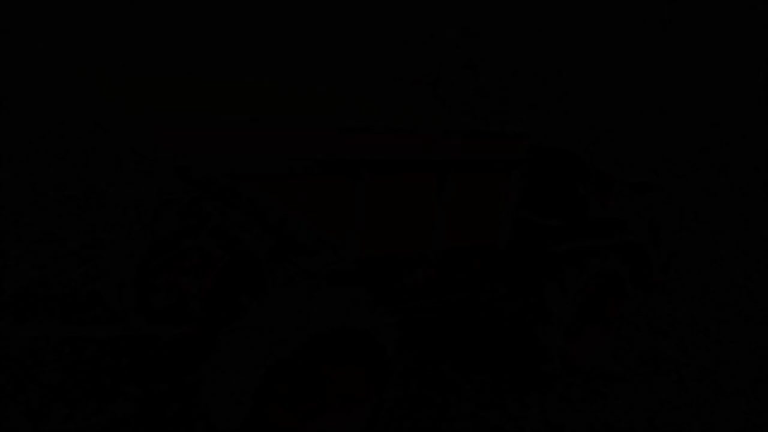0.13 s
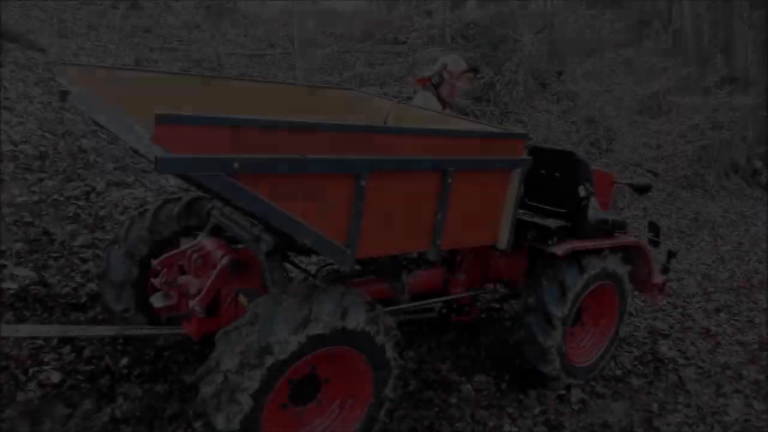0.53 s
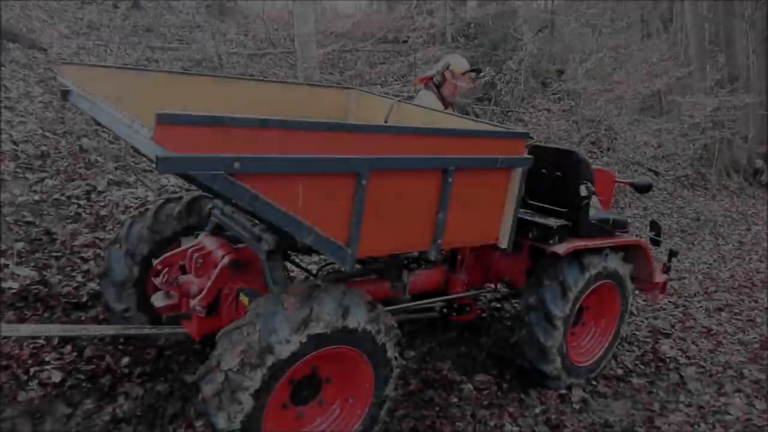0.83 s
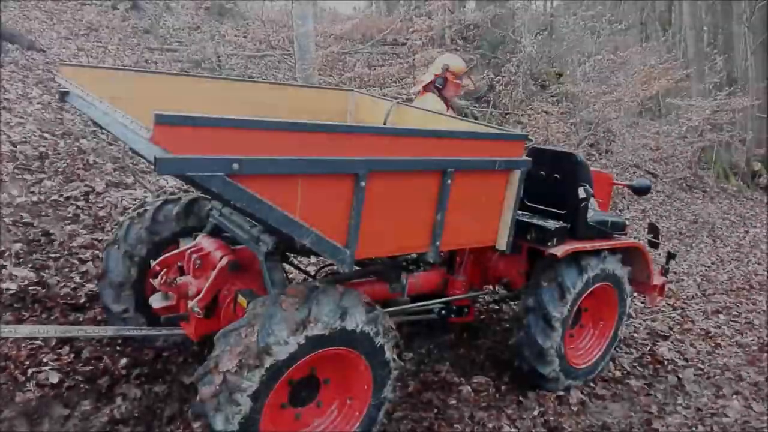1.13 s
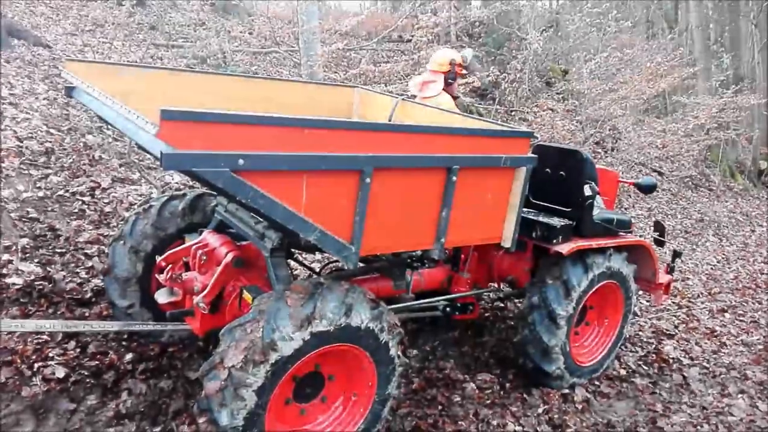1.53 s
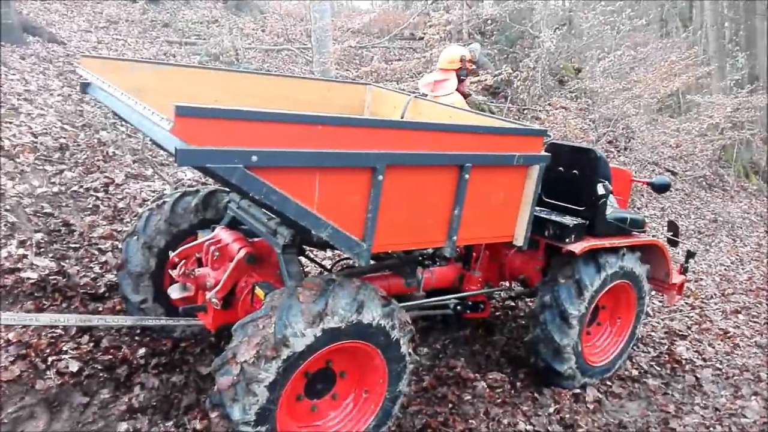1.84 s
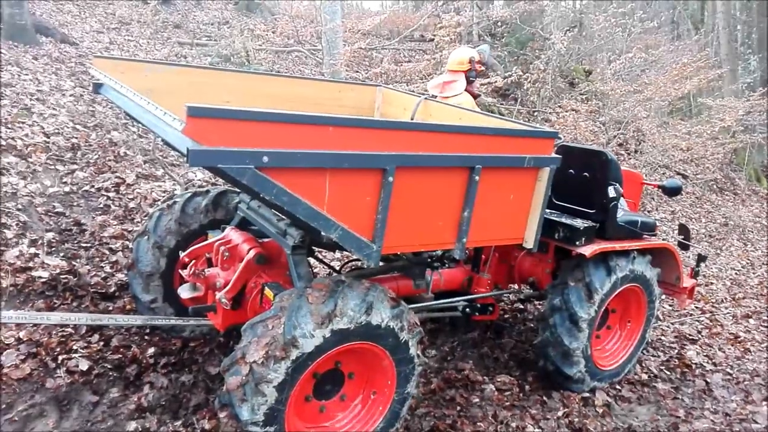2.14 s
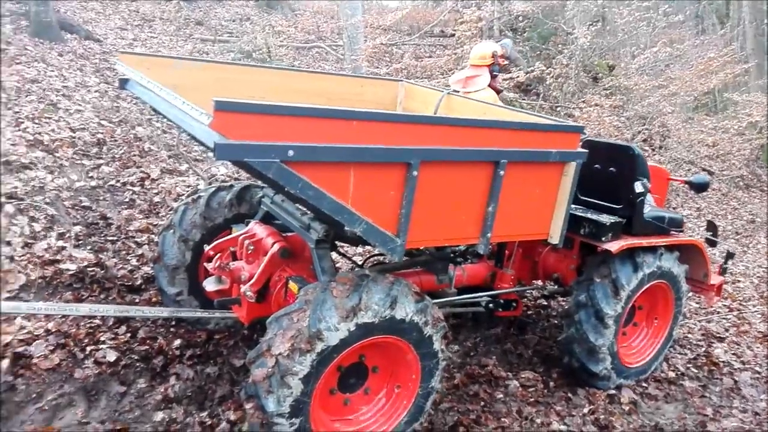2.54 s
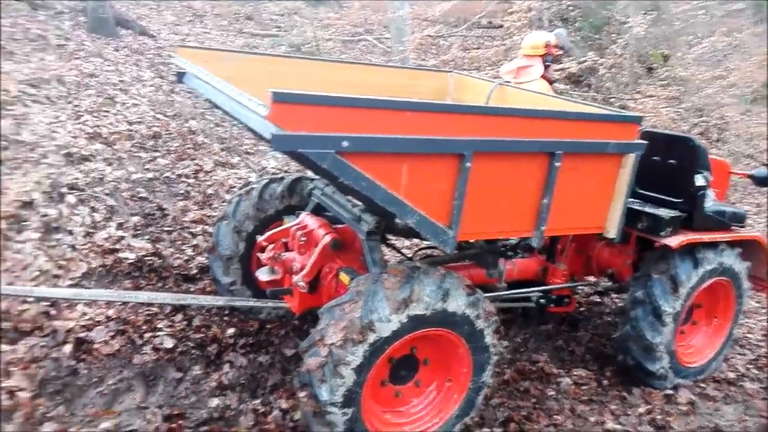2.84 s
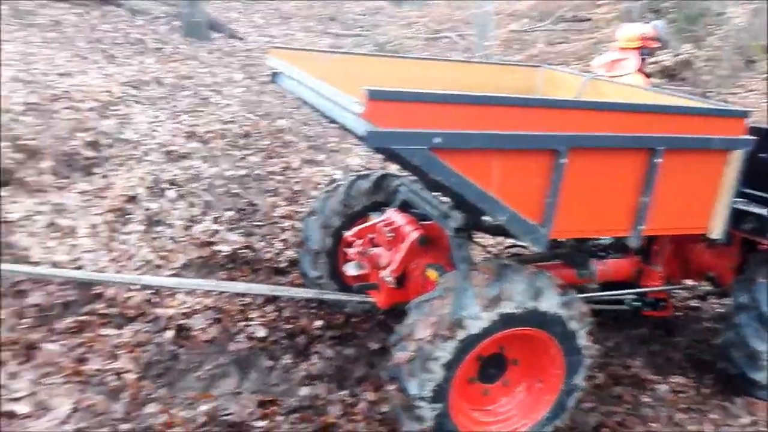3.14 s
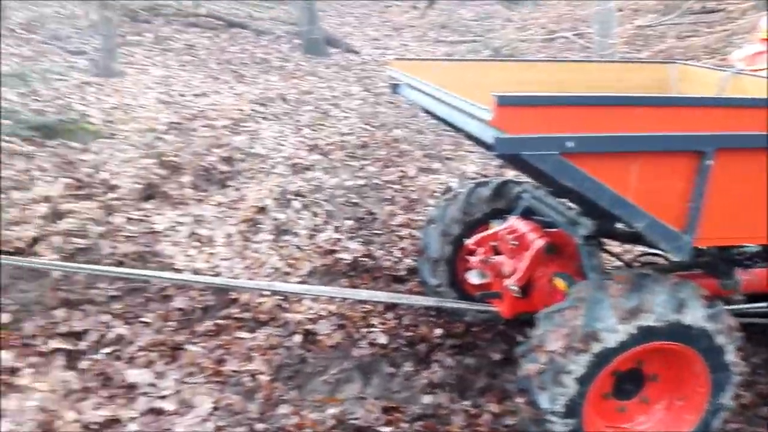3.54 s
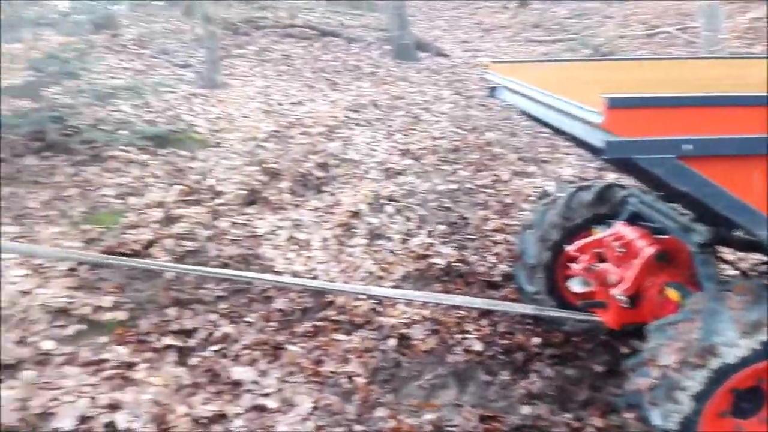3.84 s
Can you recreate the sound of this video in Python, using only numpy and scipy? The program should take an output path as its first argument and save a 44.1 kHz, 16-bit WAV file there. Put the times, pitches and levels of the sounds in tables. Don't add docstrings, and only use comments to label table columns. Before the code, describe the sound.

Slow diesel tractor engine thumping about five times a second, rattling and growing steadily louder.

```python
import sys
import numpy as np
from scipy import signal
from scipy.io import wavfile

SR = 44100
rng = np.random.default_rng(int(sys.argv[2]) if len(sys.argv) > 2 else 0)


def inscribe(sig):
    pcm = np.round(np.clip(np.atleast_2d(sig).T, -1, 1) * 32767)
    wavfile.write(sys.argv[1], SR, pcm.astype(np.int16))


def gain_from_db(level_db):
    decades = np.asarray(level_db, float) / 20
    return 10 ** decades


N = 176400
RUN_IN = SR

FIRST_FIRING_S, CYCLE_S = -.3614, .19663

# time_s, level_db
SWELL = [(.13, -95), (.2, -76), (.33, -63), (.52, -55.5), (.9, -49), (1.3, -45.5), (1.7, -43), (2.1, -38.5),
         (2.5, -37), (3.05, -36), (3.25, -33), (4, -31.5)]
# freq_hz, density_db_per_hz
RATTLE_SPECTRUM = [(120, -28), (200, 2.5), (454, -11.5), (1560, -8.5), (2660, -16.5), (5820, -31),
                   (7340, -28), (14200, -52)]
# freq_hz, width_hz, level_db
PANEL_MODES = [(138, 9.2, -28), (165, 6.7, -20), (438.4, 11.5, -31), (745, 31, -48), (903, 15, -32.5),
               (998, 10, -31.5), (1257, 11.6, -22.5), (1482, 20, -30.5), (1556, 88, -19.5), (2020, 15, -58),
               (2221, 23, -32.5), (2477, 17, -59), (3088, 110, -29.5), (3490, 100, -33.5),
               (12300, 3800, -46.5)]
# after_firing_s, level_db, ring_hz, width_hz
VALVE_SEATINGS = [
    (.068, -34, 6050, 250),
    (.074, -37, 6650, 250),
    (.104, -32, 5680, 110),
    (.108, -36, 6100, 250),
    (.108, -33, 3480, 250),
    (.08, -26, 1260, 40),
    (.006, -35, 4500, 150),
]
# after_firing_s, level_db, low_hz, high_hz, t60_s
GAS_PUFFS = [(-.023, -26.5, 7200, 15000, .22), (-.004, -7.5, 500, 1650, .3),
             (-.001, -15.5, 2050, 2590, 0.2), (.001, -17.5, 2620, 3960, .26),
             (.002, -20.5, 4380, 7070, 0.16), (.002, -36.5, 7200, 14500, 0.16),
             (.043, -38.5, 4470, 9100, 0.18), (0.067, -27, 7260, 9330, .18), (0.067, -27, 5500, 6770, 0.2),
             (.069, -33.5, 10000, 15200, 0.21), (.078, -11.5, 800, 1640, .2),
             (.103, -35.5, 6500, 14600, .3), (0.101, -25, 5000, 6400, 0.18),
             (0.105, -16.5, 970, 1710, 0.18), (0.105, -25, 3130, 3600, 0.12)]
# after_firing_s, softness_hz
GAS_PULSES = [
    (-.0044, 900),
    (.0472, 40),
    (.104, 40),
    (.1741, 72),
]
# freq_hz, signed_height, t60_s
FRAME_MODES = [(149, -.39, .54), (199, -.27, .45), (311, .73, .123)]
# freq_hz, signed_height, t60_s
EXHAUST_MODES = [(39.7, -12.2, .107), (53.1, 18.2, .052), (87.6, 8.2, .294), (108.3, -5.8, .36),
                 (119.6, 5.2, .44)]
# freq_hz, signed_height, t60_s
INTAKE_MODES = [(41.2, 3.1, .47), (72, -5.7, .069), (239.6, -6.8, .275)]
# freq_hz, signed_height, t60_s
AIRBOX_MODES = [(50.2, -.58, .9), (113.4, -2, .21)]
# time_s, level_db
COMBUSTION_KNOCKS = [(0.2283, -75.8), (0.4249, -60.4), (0.6216, -55.8), (0.8182, -51.7), (1.015, -48.4),
                     (1.2113, -47.4), (1.4074, -51.8), (1.6044, -45.9), (1.8013, -43.5), (1.9982, -40.3),
                     (2.1947, -40.0), (2.3909, -41.3), (2.5873, -38.5), (2.7839, -38.6), (2.9807, -40.5),
                     (3.1774, -36.0), (3.374, -35.4), (3.5706, -38.5), (3.7675, -36.0), (3.9644, -34.0)]
# delay_s, signed_strength
KNOCK_BLOWS = [
    (-.00136, 1),
    (.00092, -1.6),
    (.0076, -.29),
]
# freq_hz, signed_height, t60_s
BLOCK_MODES = [(514, -0.18, 0.2), (679, -0.44, 0.042), (812, -0.2, 0.2), (887, 0.35, 0.2),
               (1053, 0.51, 0.068), (1159, -0.11, 0.2), (1329, 1.8, 0.062), (1419, -1.01, 0.059),
               (1549, -0.24, 0.172), (1597, 0.67, 0.06), (1892, -0.23, 0.071), (2206, -0.24, 0.156),
               (2335, -0.02, 0.2), (2476, 0.28, 0.047)]


def rms_one(x):
    return x / np.sqrt(np.mean(x ** 2) + 1e-20)


def clicks(times_s, gain):
    out = np.full(N + 2 * RUN_IN, 1e-18)
    at = np.round(np.asarray(times_s) * SR).astype(int) + RUN_IN
    np.add.at(out, at, gain)
    return out[:N + RUN_IN]


def varied(level_db, spread_db, shape):
    return gain_from_db(level_db + spread_db * rng.standard_normal(shape))


def ring(x, freq_hz, t60_s):
    r = gain_from_db(-60 / (t60_s * SR))
    w = 2 * np.pi * freq_hz / SR
    return signal.lfilter([0, np.sin(w)], [1, -2 * r * np.cos(w), r * r], x)


def soften(x, softness_hz):
    r = np.exp(-2 * np.pi * softness_hz / SR)
    return signal.lfilter([(1 - r) ** 2], [1, -2 * r, r * r], x)


def band(x, low_hz, high_hz):
    edges_hz = [low_hz, min(high_hz, .45 * SR)]
    return signal.sosfilt(signal.butter(2, edges_hz, "band", fs=SR, output="sos"), x)


def decay(x, t60_s, rise_s):
    r = np.exp(-1 / (rise_s * SR))
    falling = signal.lfilter([1], [1, -gain_from_db(-60 / (t60_s * SR))], x)
    return signal.lfilter([1 - r], [1, -r], falling)


def swell_db(time_s):
    return np.interp(time_s, *np.transpose(SWELL))


def firings():
    return np.arange(FIRST_FIRING_S, N / SR + CYCLE_S, CYCLE_S)


def grains():
    size = N + RUN_IN
    return rng.standard_normal(size) * gain_from_db(2 * rng.exponential(1, size))


def rattle_ticks():
    shape, ticks_per_s = (2, N + RUN_IN), 3000
    hits = rng.random(shape) < ticks_per_s / SR
    strength = gain_from_db(3.7 * np.minimum(rng.exponential(1, shape), 4))
    ticks = hits * strength * rng.choice([-1, 1], shape)
    return ticks + 0.43 * rng.standard_normal(shape)


def rattle():
    ticks = rattle_ticks()
    freq_hz, density_db = np.transpose(RATTLE_SPECTRUM)
    edges_hz = 180 * 2 ** np.arange(0, 6.6, .5)
    gears = 0
    for k, (low_hz, high_hz) in enumerate(zip(edges_hz, edges_hz[1:])):
        band_db = np.interp(np.log(low_hz * high_hz) / 2, np.log(freq_hz), density_db)
        gears = gears + gain_from_db(band_db) * band(ticks[k % 2], low_hz, high_hz)
    shake = decay(clicks(firings(), gain_from_db(9)), t60_s=0.2, rise_s=0.0042)
    shaken = ticks[0] * (1 + shake)
    out = gain_from_db(-16) * rms_one(gears)
    for panel_hz, width_hz, level_db in PANEL_MODES:
        out = out + gain_from_db(level_db) * rms_one(ring(shaken, panel_hz, 3.2 / width_hz))
    return out


def valves():
    out, times_s = 0, firings()
    chatter_s, gain_db = 0.012, 20
    for after_s, level_db, ring_hz, width_hz in VALVE_SEATINGS:
        seats = clicks(times_s + after_s, varied(level_db, 2.8, len(times_s)))
        shape = decay(seats, 7 * chatter_s, rise_s=0.00095)
        chatter = shape * rng.standard_normal(len(shape))
        even_power = np.sqrt(width_hz / SR)
        out = out + ring(chatter, ring_hz, 2.2 / width_hz) * even_power * gain_from_db(gain_db)
    return out


def puffs():
    out, times_s = 0, firings()
    knock_share, spread_db = 0.66, 1.16
    knock_s, knock_db = np.transpose(COMBUSTION_KNOCKS)
    hardness_db = knock_db - swell_db(knock_s)
    hardness_db = np.interp(times_s, knock_s, hardness_db - hardness_db.mean())
    for after_s, level_db, low_hz, high_hz, t60_s in GAS_PUFFS:
        at_firing = abs(after_s) < .01
        puff_db = level_db + knock_share * hardness_db * at_firing
        starts = clicks(times_s + after_s, varied(puff_db, spread_db, len(times_s)))
        shape = decay(starts, t60_s, rise_s=0.0018)
        out = out + shape * rms_one(band(grains(), low_hz, high_hz))
    return out


def gas():
    out, times_s = 0, firings()
    bodies = (FRAME_MODES, EXHAUST_MODES, INTAKE_MODES, AIRBOX_MODES)
    for (after_s, softness_hz), modes in zip(GAS_PULSES, bodies):
        pulses = clicks(times_s + after_s, varied(0, 0.12, len(times_s)))
        push = soften(pulses, softness_hz)
        for freq_hz, height, t60_s in modes:
            out = out + height * ring(push, freq_hz, t60_s)
    rumble_cut = signal.butter(2, 16, "high", fs=SR, output="sos")
    return gain_from_db(0.45) * signal.sosfiltfilt(rumble_cut, out)


def knock():
    knock_s, knock_db = np.transpose(COMBUSTION_KNOCKS)
    delay_s, strength = np.transpose(KNOCK_BLOWS)
    block_db, spread_db, longest_ring_s = 0.43, 1.2, 0.1
    times_s = (knock_s[:, None] + delay_s).ravel()
    relative_db = (knock_db - swell_db(knock_s))[:, None] + block_db
    out = 0
    for freq_hz, height, t60_s in BLOCK_MODES:
        gain = strength * varied(relative_db, spread_db, (len(knock_s), len(delay_s)))
        blows = clicks(times_s, gain.ravel())
        out = out + height * ring(blows, freq_hz, min(t60_s, longest_ring_s))
    return out


def scene():
    start_s = .131
    engine = rattle() + valves() + puffs() + gas() + knock()
    time_s = np.arange(N) / SR
    return (engine[RUN_IN:] * gain_from_db(swell_db(time_s)) * (time_s > start_s))[None]


def band_limit(x):
    return signal.sosfilt(signal.butter(12, 15520, fs=SR, output="sos"), x)


def record(dry):
    low_pass = signal.ellip(12, .5, 70, 14250, fs=SR, output="sos")
    mix = signal.sosfilt(low_pass, dry)
    return band_limit(mix)


dry = scene()
out = record(dry)
inscribe(out)
```